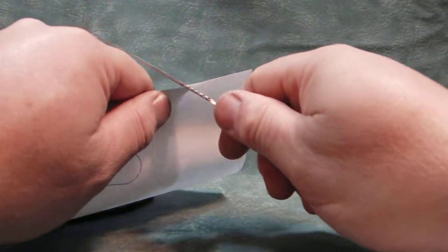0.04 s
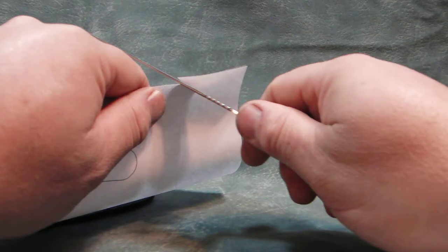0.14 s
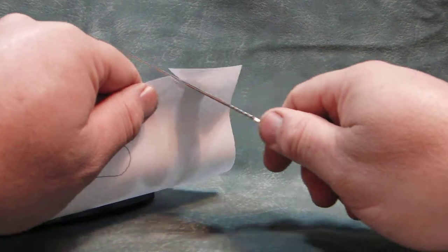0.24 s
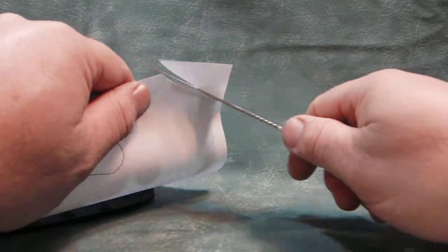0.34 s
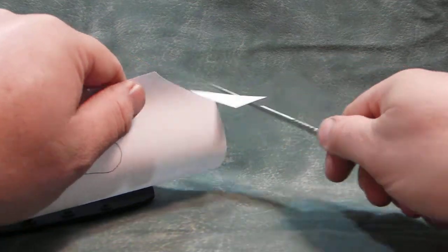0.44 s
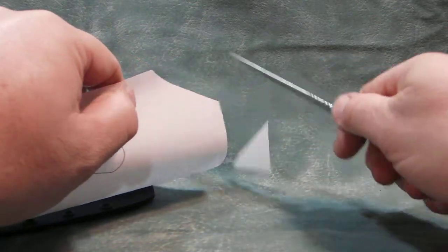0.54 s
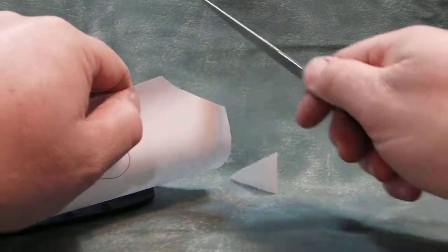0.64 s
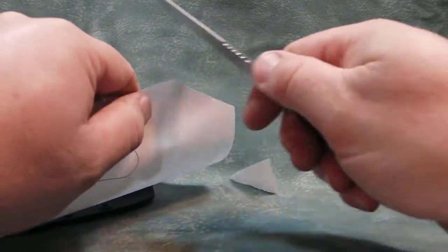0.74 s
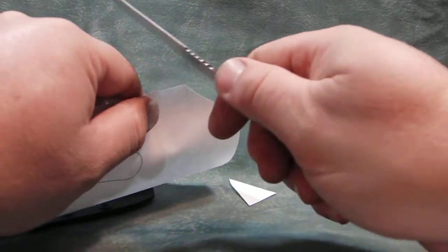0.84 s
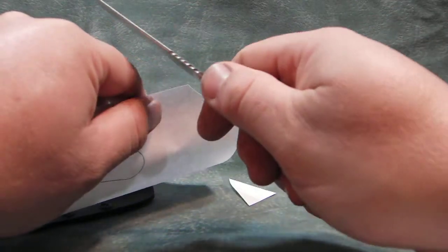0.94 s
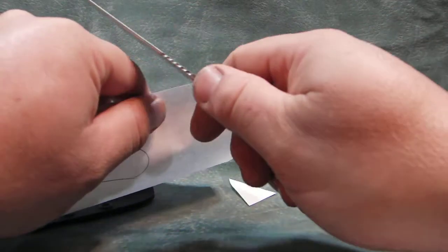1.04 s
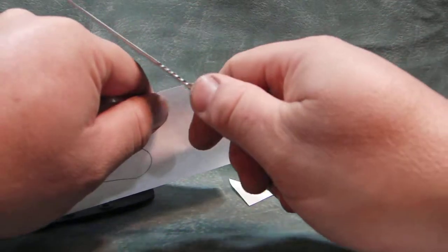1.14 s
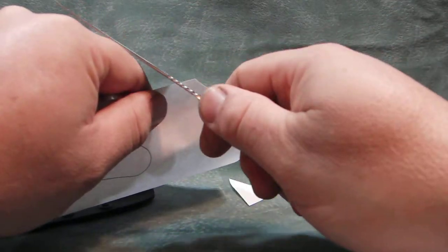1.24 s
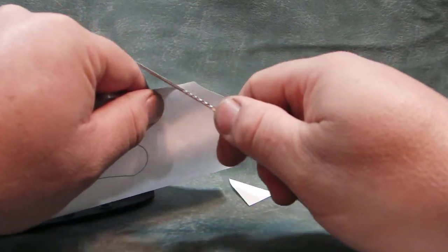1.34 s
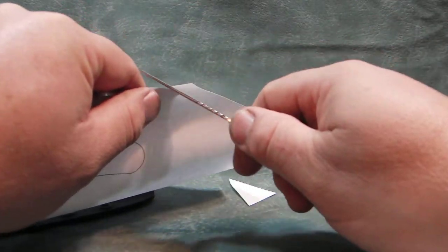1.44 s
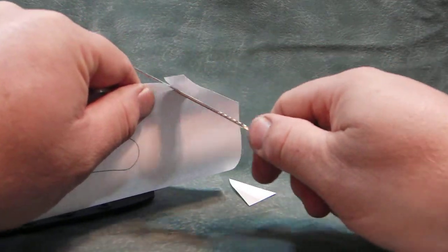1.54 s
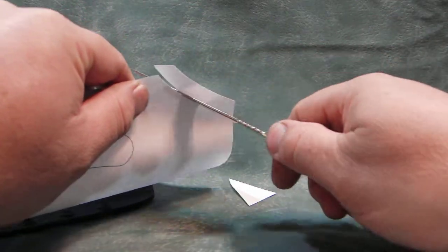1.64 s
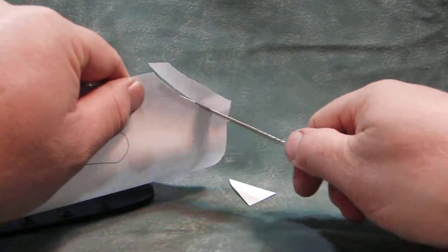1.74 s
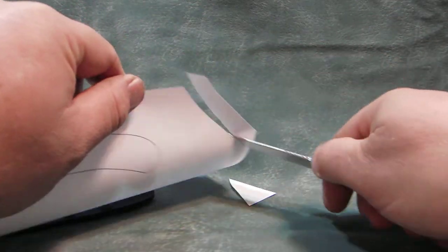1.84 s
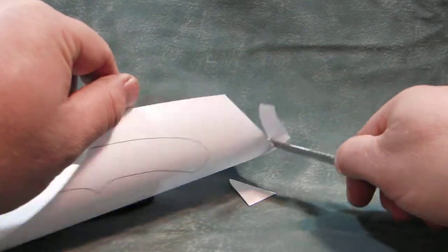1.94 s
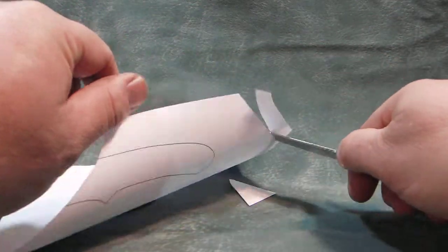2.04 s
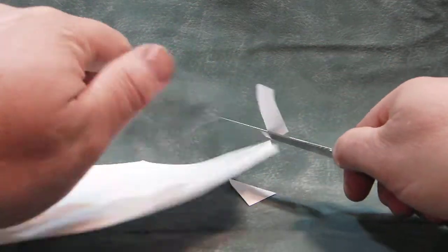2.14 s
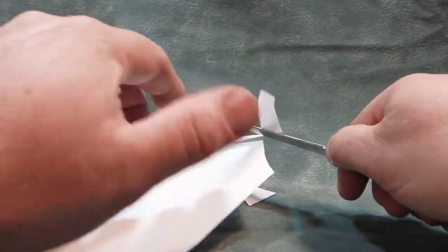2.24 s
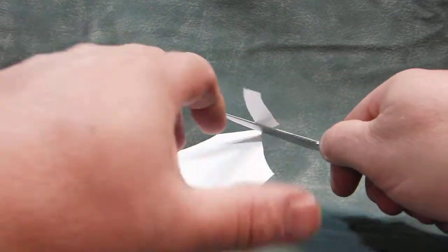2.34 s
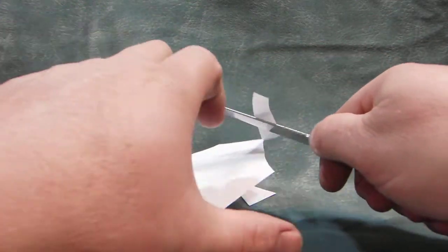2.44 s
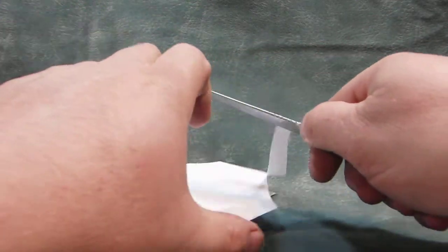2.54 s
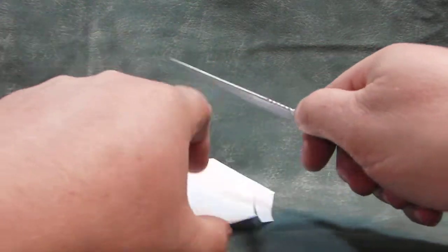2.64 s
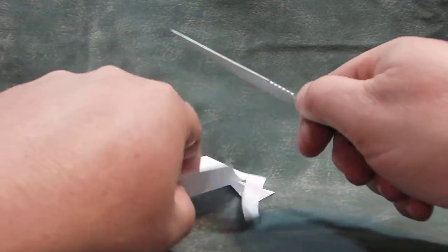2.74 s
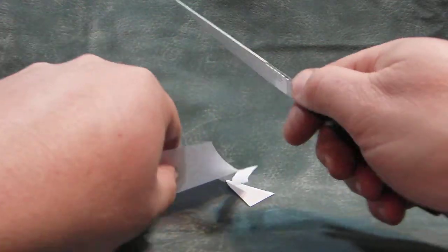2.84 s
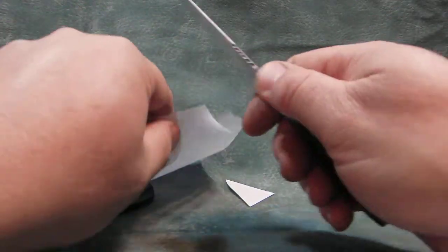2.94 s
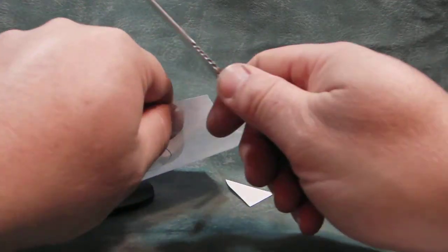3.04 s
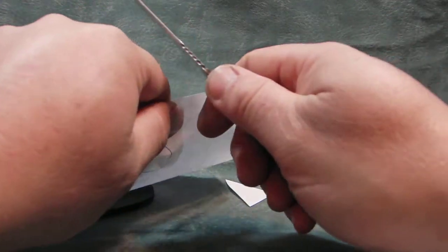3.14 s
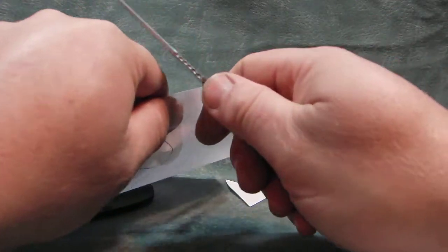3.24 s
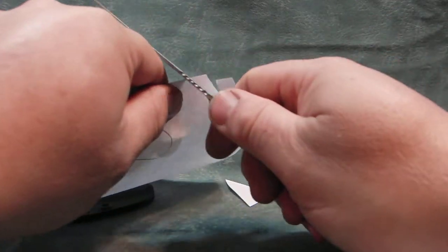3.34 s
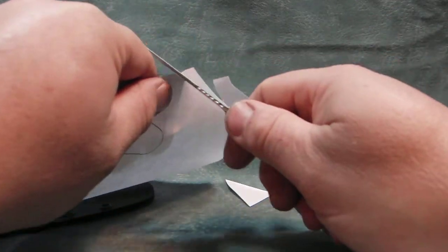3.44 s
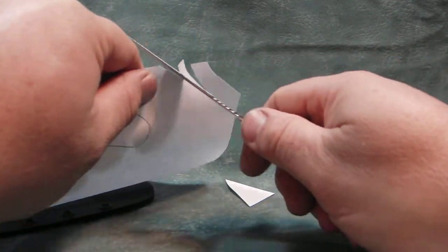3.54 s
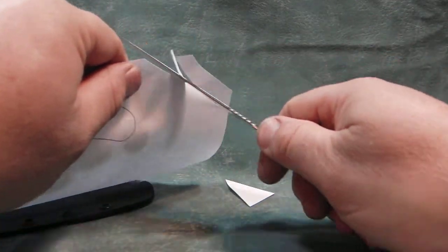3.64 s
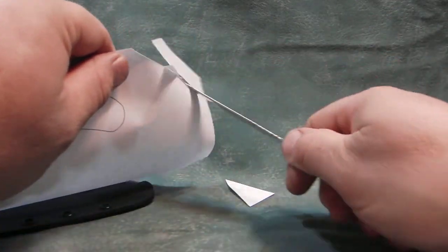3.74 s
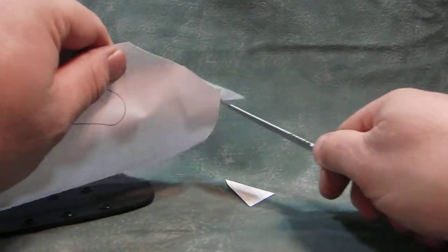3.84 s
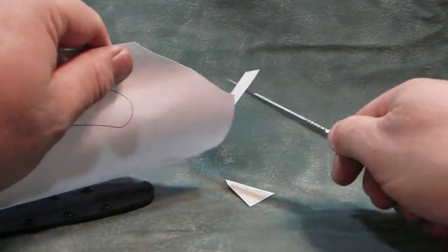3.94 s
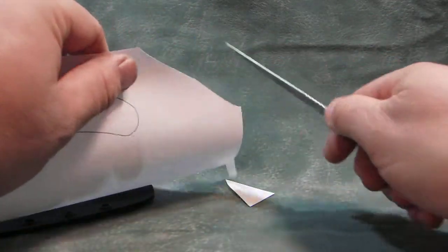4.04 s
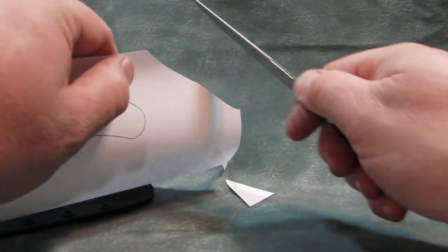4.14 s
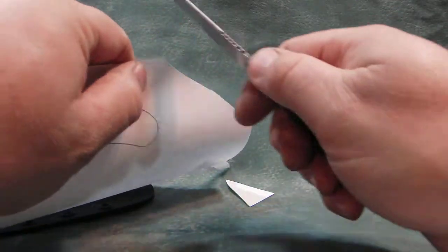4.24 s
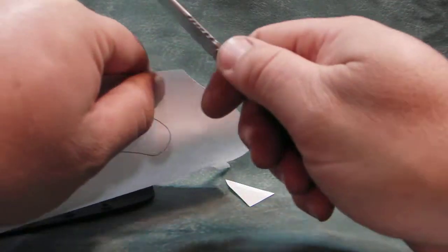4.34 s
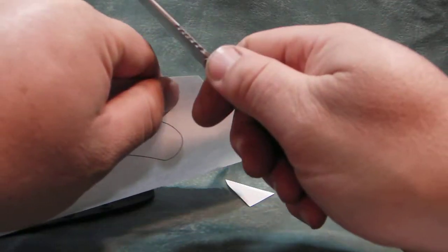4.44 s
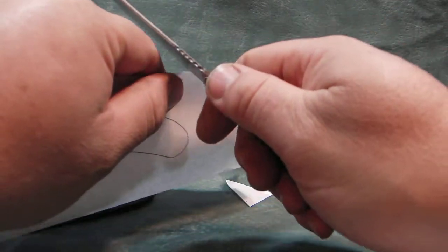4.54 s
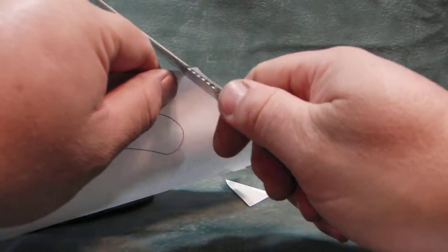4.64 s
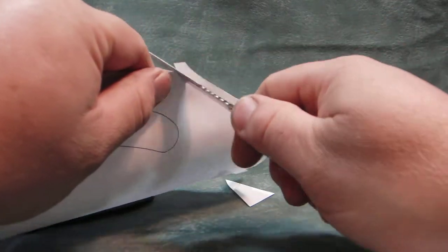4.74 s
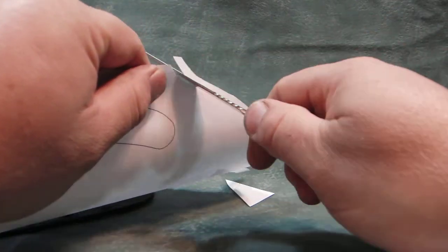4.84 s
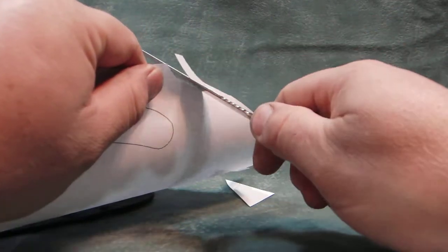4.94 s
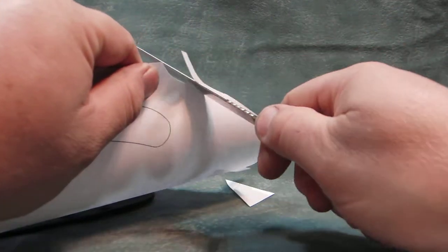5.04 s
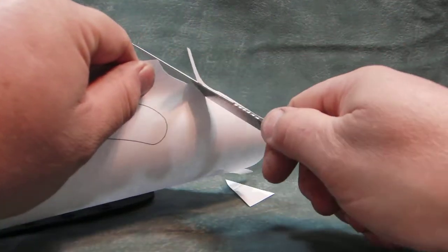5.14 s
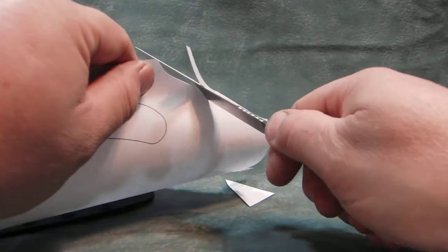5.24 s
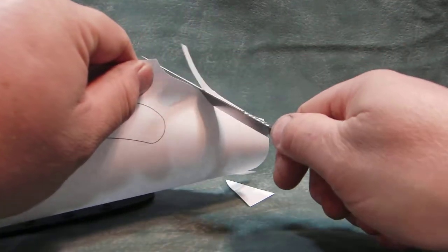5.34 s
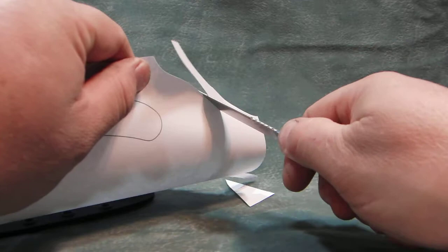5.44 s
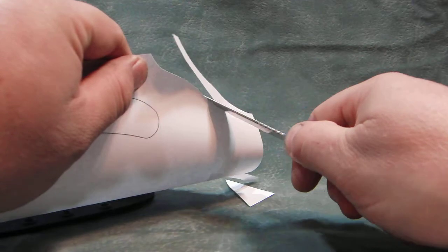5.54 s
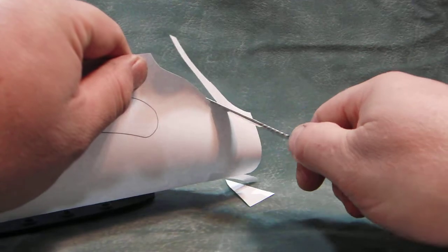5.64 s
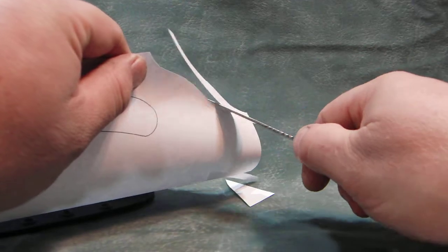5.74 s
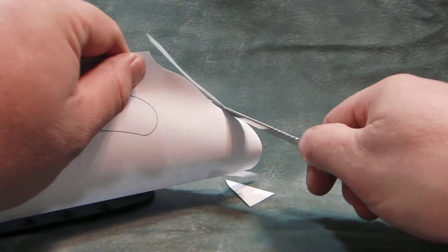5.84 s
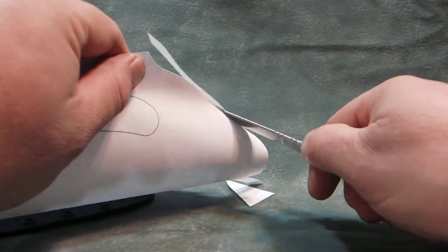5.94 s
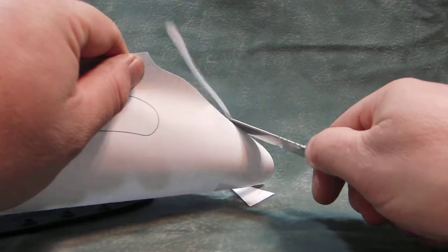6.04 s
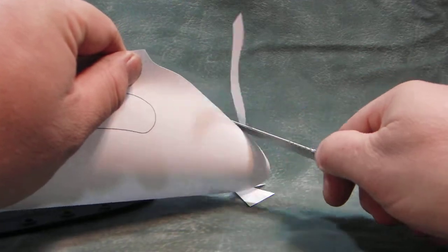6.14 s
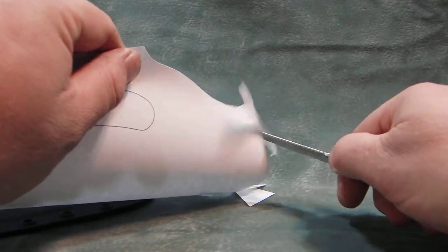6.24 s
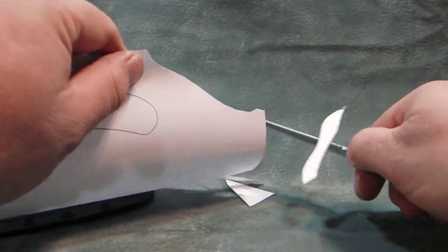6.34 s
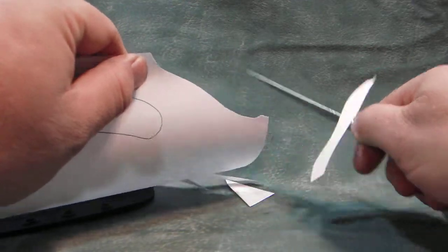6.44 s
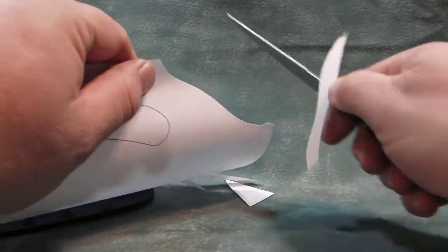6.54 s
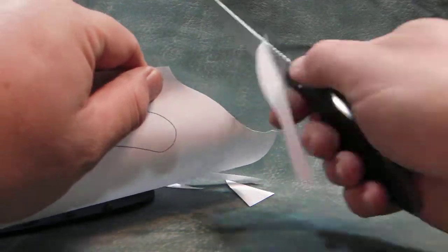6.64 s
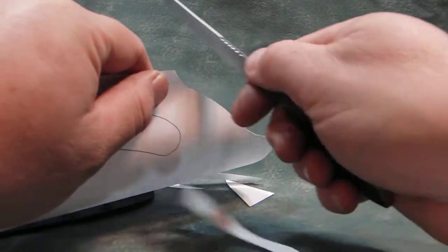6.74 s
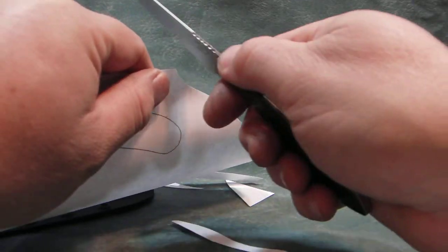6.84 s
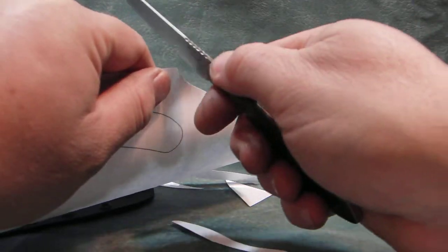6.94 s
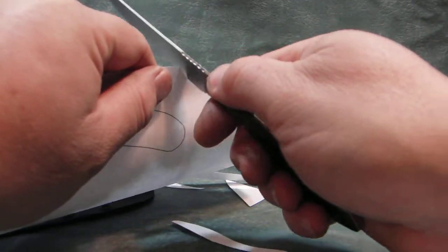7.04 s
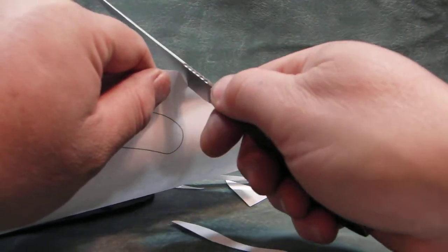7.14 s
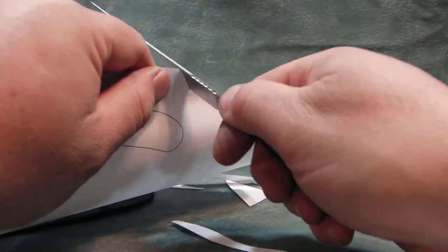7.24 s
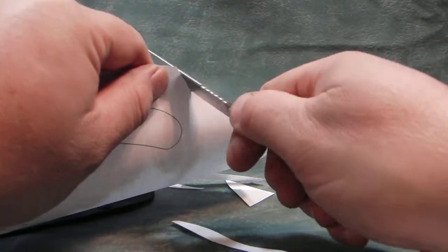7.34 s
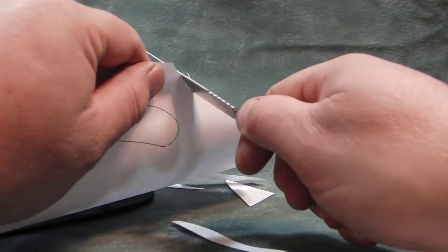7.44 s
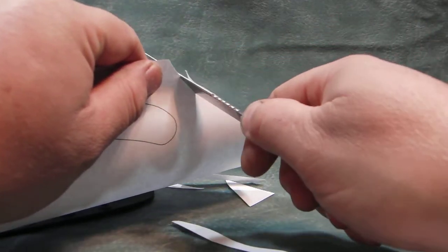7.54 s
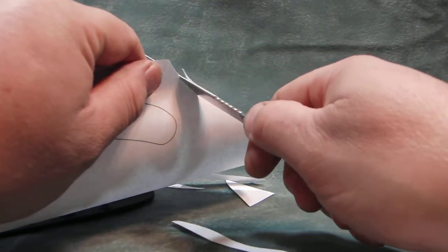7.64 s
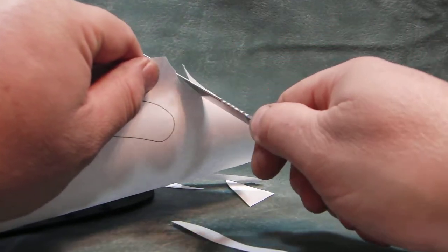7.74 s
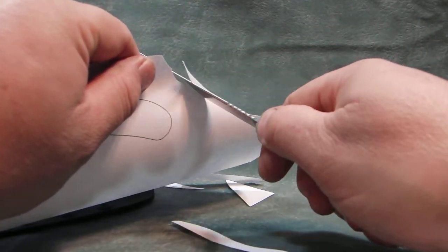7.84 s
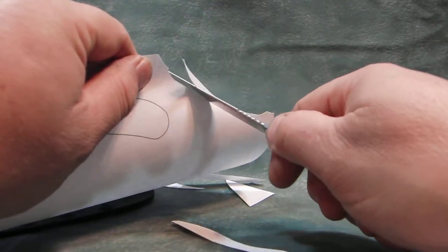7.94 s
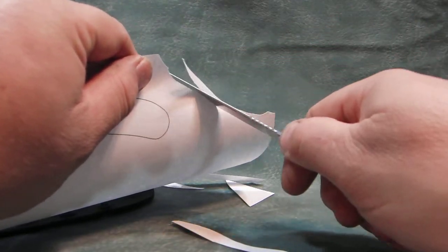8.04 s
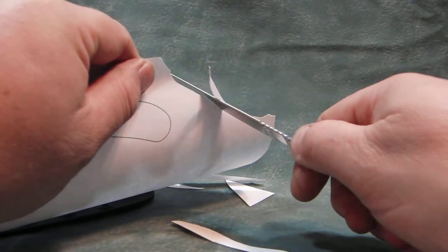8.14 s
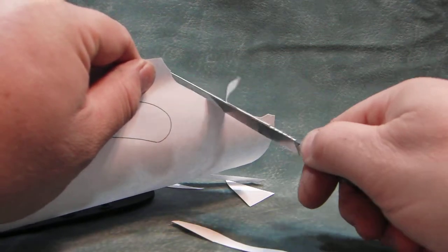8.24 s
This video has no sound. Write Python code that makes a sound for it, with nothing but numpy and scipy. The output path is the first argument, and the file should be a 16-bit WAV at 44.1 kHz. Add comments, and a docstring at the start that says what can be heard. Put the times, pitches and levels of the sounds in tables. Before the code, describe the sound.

In a quiet room, a blade cuts through a sheet of paper close to the microphone, making a grainy, crackling rasp. The first cuts are brief and spaced apart, and the paper slides, crinkles and pops softly in the hand between them. Then several strokes run together, ending in a cluster of sharp snaps. A short lull leads to a last, lighter and hissier series of cuts over faint room tone.

```python
"""Knife through a hand-held sheet of paper

A thin knife slices strips off the sheet, close to the microphone in a quiet room.
Each push of the blade is a dense run of random clicks, the snapping fibres, coloured by the sheet.
Around the pushes the paper slides (fine grains), crumples (click bursts), snaps, pops and is
knocked (ringing modes). Short dull scatter, a faint room, room tone and hum lie behind it all.
The recorder adds a boxy low bump, four narrow notches and a cut top."""
import sys
import numpy as np
from scipy import signal
from scipy.fft import rfft, irfft, next_fast_len
from scipy.io import wavfile

SR = 44100
rng = np.random.default_rng(int(sys.argv[2]) if len(sys.argv) > 2 else 0)


def dump_mix(stems):
    """Bounce the given channels to the path in sys.argv[1] as a 16-bit WAV at rate SR."""
    frames = np.atleast_2d(stems).T  # one column per channel
    limited = np.clip(frames, -1, 1)  # hard clip at full scale
    pcm = np.round(limited * 32767).astype(np.int16)
    wavfile.write(sys.argv[1], SR, pcm)


N = 366471
TIME = np.arange(N) / SR

# Colour of the cut for each way the sheet is held: f/Hz, relative level per Hz/dB
CORNER_CUT = [(24, -63), (40, -31.5), (496, -18.5), (973, -7.5), (1130, -11), (2220, -4.5), (2710, -10.5),
              (3060, -4.5), (4240, 1), (5050, -9.5), (6160, -13), (7910, -21), (9180, -19.5), (15500, -27)]
SHORT_CUT = [(24, -68), (40, -42), (509, -22.5), (1490, -9.5), (1860, 2), (2450, 0), (2640, -3),
             (2990, 0.5), (3740, 2), (5050, -4.5), (6320, -9), (7710, -22), (9650, -23.5), (15500, -32)]
SLACK_CUT = [(24, -67), (40, -40), (273, -24.5), (461, -16), (496, -15), (1020, -12), (2060, -6.5),
             (2710, -9), (3140, -7), (4920, -4), (6160, -6), (7710, -12.5), (10100, -16), (15500, -21)]
LONG_CUT = [(24, -68), (40, -43), (325, -17.5), (397, -22), (686, -6.5), (1410, -6.5), (1820, 3),
            (2710, -2.5), (3470, 1.5), (4920, 0.5), (6810, -2.5), (7910, -6.5), (13700, -6.5),
            (15500, -9.5)]
ENTERING_CUT = [(24, -61), (40, -32), (202, -30), (309, -20), (496, -22), (637, -14.5), (1100, -22),
                (1820, -6), (2710, -18), (3840, -5), (5050, -9.5), (6640, -4.5), (7910, -2), (15500, -5)]
SHAVING_CUT = [(24, -69), (40, -39), (170, -19), (317, -9), (496, -6), (949, 2.5), (1770, -12),
               (2710, -16.5), (3220, -14.5), (5720, -3), (6640, 0), (7910, -9), (13000, -5), (15500, -7)]


def from_db(db):
    """Decibels to gain."""
    return 10 ** (np.asarray(db) / 20)


def rms_one(x):
    """Scale to unit power."""
    return x / np.sqrt(np.mean(x ** 2) + 1e-20)


def cut(x, hz, kind, order=2):
    """Butterworth filter; the tiny offset keeps silence from slowing it down."""
    sos = signal.butter(order, np.clip(hz, 10, .45 * SR), kind, fs=SR, output="sos")
    return signal.sosfilt(sos, x + 1e-18)


def coloured(x, spectrum):
    """Shape x by a curve of (f/Hz, level/dB) points, then bring it to unit power."""
    size = next_fast_len(len(x))
    curve_hz, curve_db = np.transpose(spectrum)
    hz = np.arange(size // 2 + 1) * SR / size
    gain = from_db(np.interp(np.log(hz + 1), np.log(curve_hz), curve_db))
    return rms_one(irfft(rfft(x, size) * gain, size)[:len(x)])


def split(x, edges_hz):
    """Overlapping bands that add up to x again."""
    size = next_fast_len(len(x))
    hz = np.arange(size // 2 + 1) * SR / size
    spectrum = rfft(x, size)
    below = [1 / (1 + (hz / edge) ** 14) for edge in edges_hz]
    band_gains = np.diff([0 * hz, *below, 1 + 0 * hz], axis=0)
    return [irfft(spectrum * gain, size)[:len(x)] for gain in band_gains]


def drift(t, rate):
    """Random wander through 'rate' normal-distributed points per second, joined by straight lines."""
    knots = rng.standard_normal(4000)
    return np.interp((t - t[0]) * rate, np.arange(len(knots)), knots)


def grains(t, per_s, spread_db, smooth_db):
    """Random clicks, many small and few large, over smooth friction noise; unit power."""
    sizes = from_db(spread_db * np.minimum(rng.exponential(1, len(t)), 4.2))
    signs = rng.choice([-1, 1], len(t))
    clicks = sizes * signs * (rng.random(len(t)) < per_s / SR)
    return rms_one(rms_one(clicks) + from_db(smooth_db) * rng.standard_normal(len(t)))


def edges_db(t, rise_s, hold_s, t60):
    """Level of a gesture that gains 10 dB per rise_s until t = 0, holds and dies away."""
    return 10 * np.minimum(t, 0) / rise_s - 60 * np.maximum(t - hold_s, 0) / t60


def moving_resonance(x, hz, width_hz, size=128):
    """A two-pole resonance of about unit peak gain, retuned to hz every block of 'size' samples."""
    r = np.exp(-np.pi * width_hz / SR)
    zeros = np.array([1, 0, -1]) * (1 - r * r) / 2
    out, state = np.zeros(len(x)), np.zeros(2)
    for i in range(0, len(x), size):
        poles = [1, -2 * r * np.cos(2 * np.pi * hz[i] / SR), r * r]
        out[i:i + size], state = signal.lfilter(zeros, poles, x[i:i + size], zi=state)
    return out


def struck(events, modes, vary_db):
    """Each event sets every mode ringing as a decaying sine with a strength of its own."""
    s, strength_db = np.transpose(events)
    out = np.zeros(N)
    chance = rng.standard_normal((len(s), len(modes)))
    for k, (hz, db, t60) in enumerate(modes):
        clicks = np.zeros(N)
        clicks[(s * SR).astype(int)] = from_db(strength_db + db + vary_db * chance[:, k])
        r, w = from_db(-60 / (t60 * SR)), 2 * np.pi * hz / SR
        ringing = signal.lfilter([0, np.sin(w)], [1, -2 * r * np.cos(w), r * r], clicks + 1e-18)
        out += (-1) ** k * ringing
    return out


def reflections(x, t60, delay_s, dull_hz):
    """A diffuse tail of decaying noise, dulled above dull_hz and of unit energy."""
    t = TIME[:SR]
    tail = rng.standard_normal(SR) * from_db(-60 * t / t60) * (t > delay_s)
    tail = cut(tail, dull_hz, "low", order=1)
    return signal.fftconvolve(x, tail / np.sqrt(np.sum(tail ** 2)))[:N]


def cuts():
    """All pushes of the blade; each swells along its travel and arches in its middle."""
    # As the sheet sags, its drumming and the edge hiss grow together against the rasp. One row per push:
    # start t/s, end t/s, attack/s, release/s, level/dB, swell/dB, arch/dB, drumming against rasp/dB,
    # hiss against rasp/dB before a common trim, sag/dB, fizz against rasp/dB, fizz growth/dB,
    # flap at start f/Hz, flap at end f/Hz, kind of cut. Level is before the common gain below.
    pushes = [ (0.000, 0.342, 0.00067, 0.002, -22, 2, 2, -15.5, -8, 9, -10.5, 6.5, 1830, 2160, "corner"),
              (1.274, 1.382, 0.0063, .012, -30.5, -2.5, 1, -6.5, -4.5, -2, -5.5, -2, 1880, 1860, "short"),
              (1.372, 1.765, 0.021, 0.0056, -24.5, 12.5, 1, -10.5, -7.5, -6.5, -9.5, -11.5, 1850, 1800, "short"),
              (1.770, 1.899, .004, .03, -38.5, -4.5, 0, -8, -7, 4, -7, -7, 1850, 1800, "long"),
              (3.305, 3.657, .005, 0.0052, -30, 14, 1.5, -6.5, -4.5, 0, -7.5, -9, 1140, 910, "slack"),
              (4.566, 4.898, 0.0054, 0.016, -30, 1, -2.5, -5, -2, 6, -7, -8, 2150, 1330, "long"),
              (4.921, 5.152, 0.028, 0.016, -30, -2.5, 0, -3, 0, -3, -12.5, 4, 1020, 1670, "long"),
              (5.161, 5.305, 0.029, .015, -31, 3, -4, -3.5, -2, -1.5, -11, -2, 1310, 1560, "long"),
              (5.300, 5.617, 0.024, 0.024, -25.5, -4.5, 3.5, -8, -10.5, -4, -14.5, -4, 1610, 1650, "long"),
              (5.632, 5.862, 0.012, 0.0063, -23.5, 2, 4.5, -8.5, -12.5, 5, -13.5, 7, 1950, 1740, "long"),
              (5.985, 6.024, .002, .004, -22, 0, 0.5, -8, -17, 6, -10.5, -3, 1900, 1790, "ragged"),
              (6.026, 6.105, .006, 0.0036, -29.5, 0, -0.5, -3, -10, 7.5, -5, -2, 720, 540, "ragged"),
              (7.055, 7.130, 0.0028, .015, -37.5, 2, -4, -11.5, -11, 0, -8, 4, 3900, 4000, "entering"),
              (7.13, 7.363, 0.011, 0.016, -30.5, -3.5, -1.5, -15, -3, 10, -6.5, -6, 3630, 3980, "entering"),
              (7.336, 7.546, 0.0097, 0.015, -35, -4, 3.5, -7.5, 1, 0.5, -10.5, 1, 1870, 1560, "shaving"),
              (7.568, 7.615, .014, 0.03, -32.5, -10, 0, -4.5, -1.5, -6, -12, -3, 1240, 1260, "shaving"),
              (7.615, 7.989, 0.033, 0.044, -28, -0.5, -0.5, -7, -.5, 1, -10, 6, 1100, 1780, "fraying"),
              (7.995, 8.310, .02, .01, -34.5, 7.5, 0, -1, -4.5, -2, -13.5, -2, 1270, 1460, "fraying"), ]
    return from_db(0.5) * sum(push(*row) for row in pushes)


def push(start, end, attack_s, release_s, level_db, swell_db, arch_db, drum_db, hiss_db, sag_db,
         fizz_db, fizz_growth_db, flap_start_hz, flap_end_hz, kind,
         judder_db=0.3, waver_db=1.18, sharpen=0.065, hiss_trim_db=2.0):
    """The same fibre snaps drive the drumming sheet, the rasp of the cut and the hiss at the edge."""
    # Kind of cut: colour, fibre snaps per s, spread of their sizes/dB
    fibres = { "corner": (CORNER_CUT, 9000, 2.4), "short": (SHORT_CUT, 7500, 2.5),
              "slack": (SLACK_CUT, 6000, 2.7), "long": (LONG_CUT, 4000, 3.1),
              "ragged": (LONG_CUT, 2500, 2.8), "entering": (ENTERING_CUT, 5000, 2.8),
              "shaving": (SHAVING_CUT, 3000, 3.2), "fraying": (SHAVING_CUT, 3500, 3.4), }
    colour, per_s, spread_db = fibres[kind]
    inside = (TIME >= start) & (TIME < end + .08)
    t = TIME[inside]
    travel = np.interp(t, [start, end], [-.5, .5])
    fibre_snaps = coloured(grains(t, per_s, spread_db, smooth_db=-9.5), colour)
    fibre_snaps = flexing(fibre_snaps, t)

    # the free flap changes length as the cut runs, so its resonance glides
    flap_hz = np.interp(t, [start, end], [flap_start_hz, flap_end_hz])
    fibre_snaps = fibre_snaps + moving_resonance(fibre_snaps, flap_hz, width_hz=430)
    drum, body, edge, hiss, fizz = split(fibre_snaps, [1400, 2700, 5000, 7800])

    # a finer cut also sharpens the rasp
    finer_db = fizz_growth_db * travel
    rasp = rms_one(body + edge * from_db(sharpen * finer_db))
    sheet = from_db(drum_db) * rms_one(drum) + from_db(hiss_db + hiss_trim_db) * rms_one(hiss)
    cutting = rasp + from_db(sag_db * travel) * sheet + from_db(fizz_db + finer_db) * rms_one(fizz)

    # the hand swells and eases its force; uneven paper makes the blade judder
    force_db = level_db + swell_db * travel + arch_db * (1 / 3 - (2 * travel) ** 2)
    uneven_db = judder_db * drift(t, rate=140) + waver_db * drift(t, rate=35.5)
    attack = np.minimum((t - start) / attack_s, 1)
    release = np.exp(-np.maximum(t - end, 0) / release_s)
    out = np.zeros(N)
    out[inside] = cutting * attack * release * from_db(force_db + uneven_db)
    return out


def flexing(x, t):
    """The bending sheet favours ever different pitches; its echo off the moving blade sweeps the treble."""
    bands = split(x, np.linspace(np.sqrt(400), np.sqrt(14500), 20) ** 2)
    depths_db = np.linspace(1.8, 3.0, len(bands))
    bent = sum(band * from_db(db * drift(t, rate=9)) for band, db in zip(bands, depths_db))
    low, high = split(bent, [7800])
    echo_s = .00033 + .00004 * drift(t, rate=5)
    return low + high + .45 * np.interp(t - echo_s, t, high)


def blade_snaps():
    """The blade catches and lets go: sharp snaps that ring short, high modes of the sheet."""
    # Snaps: t/s, strength/dB before modes, filter and mix
    snap_events = [(.282, -34), (.526, -44), (2.211, -67), (2.807, -31), (3.306, -36), (4.043, -17),
                   (4.409, -26.5), (5.3195, -19), (5.904, -27), (5.950, -25), (5.9545, -10.5), (5.960, -12),
                   (5.967, -12), (5.974, -7.5), (5.978, -30), (6.000, -18), (7.582, -32), (7.904, -19)]
    # Modes of the sheet: f/Hz, level/dB, t60/s
    snap_modes = [(1740, 3.5, 0.0044), (3880, 3, 0.0021), (7000, -6, 0.0048), (11860, -5, 0.00082)]
    snaps = cut(struck(snap_events, snap_modes, vary_db=1.5), 450, "high")
    # each snap rattles around the sheet for a few milliseconds
    return .55 * snaps + .8 * reflections(snaps, t60=.010, delay_s=.0003, dull_hz=9000)


def sheet_pops():
    """The bowed sheet pops over and rings its lower modes for a few milliseconds."""
    # Pops: t/s, strength/dB before modes and filter
    pop_events = [(.418, -26), (2.100, -24), (2.592, -28.5), (2.682, -28), (2.724, -37), (2.977, -24),
                  (3.750, -16), (3.932, -16), (3.9475, -19), (4.0452, -3), (4.4095, -17), (6.098, -10),
                  (6.249, -23)]
    # Modes of the bowed sheet: f/Hz, level/dB, t60/s
    pop_modes = [(300, -26, 0.011), (814, 2.5, 0.0024), (1160, -1, 0.0052), (1800, -15, 0.016),
                 (3870, -7, 0.0015)]
    return cut(struck(pop_events, pop_modes, vary_db=1.2), 200, "high", order=3)


def crumples():
    """Brief avalanches of clicks as the paper rips free, scuffs or buckles."""
    # Rips, scuffs and crumples: full-level t/s, level/dB before the sheet's low cut,
    # rise per 10 dB/s, hold/s, low edge f/Hz, high edge f/Hz
    bursts = [ (0.395, -35, .0005, .002, 4500, 5950), (0.676, -38, 0.024, 0.0084, 900, 4500),
              (1.255, -36.5, .0003, 0.02, 1200, 5960), (1.746, -23.5, 0.018, 0.018, 700, 3800),
              (1.974, -39, .001, 0.019, 1100, 7400), (2.03, -43, 0.0011, 0.038, 1200, 7200),
              (2.08, -33.5, .009, .005, 900, 4320), (2.212, -51, .0005, 0.0037, 2500, 7000),
              (2.343, -53, 0.0037, 0.01, 1500, 4500), (2.511, -46.5, 0.047, 0.032, 4450, 11600),
              (2.68, -31.5, 0.00091, .004, 2300, 3420), (2.721, -27.5, 0.0079, 0.015, 2200, 2870),
              (2.906, -42, 0.034, 0.027, 2500, 4170), (3.305, -30, 0.00046, 0.039, 690, 4420),
              (3.747, -15.5, 0.0033, 0.016, 640, 6750), (3.784, -26.5, 0.0016, 0.00092, 3000, 10400),
              (5.945, -36, 0.00091, 0.036, 900, 4960), (6.219, -22.5, 0.011, 0.01, 2800, 7060),
              (7.037, -35, 0.0016, 0.0017, 2500, 8600), (7.135, -32.5, .004, .06, 3000, 4550),
              (7.342, -35, .012, 0.016, 3000, 7500), ]
    out = np.zeros(N)
    for s, db, rise_s, hold_s, low_hz, high_hz in bursts:
        inside = np.abs(TIME - s) < .15
        t = TIME[inside] - s
        crackle = grains(t, per_s=6600, spread_db=3.0, smooth_db=-18.0)
        crackle = cut(crackle, low_hz, "high", order=1)
        crackle = rms_one(cut(crackle, high_hz, "low", order=3))
        out[inside] += crackle * from_db(db + edges_db(t, rise_s, hold_s, t60=0.037))
    return cut(out, 265, "high", order=2)  # a small sheet radiates little below this


def sliding(rub_db=-2.0, sheen_db=-6.0, slip_db=1.4, crinkle_db=-9):
    """Soft, fine-grained rubbing of the paper, lifted by each move of the hands."""
    # Paper sliding on blade and fingers, fading as the hand slows: start t/s, end t/s,
    # level/dB before the rub and sheen gains, fade/dB, hiss control against level/dB
    slides = [ (0.346, 0.474, -40.5, 5, -0.5), (0.535, 0.553, -41, 1.5, -2), (0.665, 0.677, -37.5, 2, -0.5),
              (0.70, 0.804, -45, 4.5, 2), (0.87, 1.15, -54, 2, -3), (1, 1.052, -51.5, 1, 4),
              (1.80, 1.927, -40.5, 4, 3.5), (1.99, 1.997, -37, 10, -10), (2.062, 2.107, -38.5, 4, -11),
              (2.588, 2.677, -57, -3, 10), (2.724, 2.834, -47, -0.5, 5.5), (2.87, 2.987, -48, -0.5, 4.5),
              (3.072, 3.091, -44.5, 4, 2.5), (3.175, 3.3, -52, 3.5, 4), (3.67, 3.733, -46, -8, 11),
              (3.78, 3.809, -34, 6, -3), (3.835, 3.90, -53.5, 1.5, 11), (3.966, 4.02, -41.5, 7.5, 1),
              (4.054, 4.12, -42, 5.5, 0.5), (4.137, 4.495, -51, -2, 1.5), (5.88, 5.94, -49, 2, 2),
              (6.115, 6.2, -44.5, 1.5, 4.5), (6.26, 6.488, -42, 14.5, 5.5), (6.507, 6.59, -52.5, 3, 2),
              (6.947, 7.04, -51.5, -1, -3), ]
    # Colour of the rubbing: f/Hz, relative level per Hz/dB
    sliding_colour = [(88, -59), (150, -13), (201, -41), (221, -21.5), (332, -7.5), (509, -7), (1910, -2),
                      (2700, -5), (3410, -5.5), (5030, -8.5), (6230, -8.5), (15500, -30.5)]
    # faint rubbing of the sheet that is only held, before the same gains
    rubbing, hissing = np.full((2, N), from_db(-60))
    for start, end, level_db, fade_db, hiss_db in slides:
        inside = (TIME > start - .1) & (TIME < end + .2)
        t = TIME[inside]
        edge_db = edges_db(t - start, rise_s=0.028, hold_s=end - start, t60=0.18)
        move_db = level_db - np.interp(t, [start, end], [0, fade_db]) + edge_db
        rubbing[inside] = np.maximum(rubbing[inside], from_db(move_db))
        hissing[inside] = np.maximum(hissing[inside], from_db(move_db + hiss_db))
    crinkles = from_db(crinkle_db) * grains(TIME, per_s=110, spread_db=3.0, smooth_db=-30)
    friction = grains(TIME, per_s=2000, spread_db=3.0, smooth_db=0.5)
    rub = coloured(friction + crinkles, sliding_colour)
    # the paper sticks and slips as it goes
    low, high = split(rub * from_db(slip_db * drift(TIME, rate=90)), [2700])
    return from_db(rub_db) * rubbing * rms_one(low) + from_db(sheen_db) * hissing * rms_one(high)


def hand_knocks():
    """The hand knocks softly against the sheet or the table: two low, damped modes."""
    # Knocks: t/s, strength/dB before modes
    knock_events = [(1.768, -43.5), (2.72, -45), (2.81, -60), (6.10, -48), (6.245, -46)]
    # Modes of the knock: f/Hz, level/dB, t60/s
    knock_modes = [(90, -11, .10), (178, 3.5, 0.052)]
    return struck(knock_events, knock_modes, vary_db=0.5)


def background():
    """Room tone, a steady coloured noise, with a faint sine hum."""
    # Colour of the room tone: f/Hz, relative level per Hz/dB
    room_colour = [(25, 6.5), (60, -1.5), (110, -2), (160, 0), (205, 5), (230, 3.5), (270, 6), (350, 1.5),
                   (450, 3.5), (1000, 5), (2000, -10), (4000, -2.5), (6500, -7.5), (10000, -12),
                   (15500, -11.5)]
    tone = from_db(-56) * coloured(rng.standard_normal(N), room_colour)
    hum = from_db(-72) * rms_one(np.sin(2 * np.pi * 229 * TIME))
    return tone + hum


def scene():
    """Paper sounds, their scatter off hands and table, the room and its background."""
    paper = cuts() + blade_snaps() + sheet_pops() + crumples() + sliding() + hand_knocks()
    # hands and scraps are too small to scatter the bass
    scattered = cut(paper, 1000, "high")
    near = from_db(-14) * reflections(scattered, t60=0.091, delay_s=0.00097, dull_hz=5200)
    room = from_db(-31) * reflections(paper, t60=1.0, delay_s=0.0046, dull_hz=4000)
    return (paper + near + room + background())[None]


def record(dry):
    """A boxy low bump and four fixed notches colour everything; the top is cut."""
    # Low colour of the recorder: f/Hz, width/Hz, level/dB
    body_bells = [(323, 51, 2), (503, 85, -4)]
    # Recorder notches: f/Hz, width/Hz
    notches = [(2690, 450), (4990, 640), (5700, 710), (7860, 960)]
    for hz, width_hz, db in body_bells:
        peak = signal.lfilter(*signal.iirpeak(hz, hz / width_hz, fs=SR), dry)
        dry = dry + (from_db(db) - 1) * peak
    for hz, width_hz in notches:
        dry = signal.lfilter(*signal.iirnotch(hz, hz / width_hz, fs=SR), dry)
    # steep low-pass at 15.7 kHz: 0.2 dB ripple, 80 dB down above
    return signal.sosfilt(signal.ellip(10, .2, 80, 15700, fs=SR, output="sos"), dry)


dry = scene()
out = record(dry)
dump_mix(out)
```